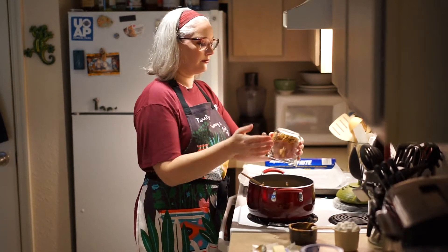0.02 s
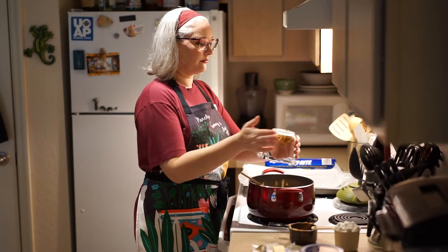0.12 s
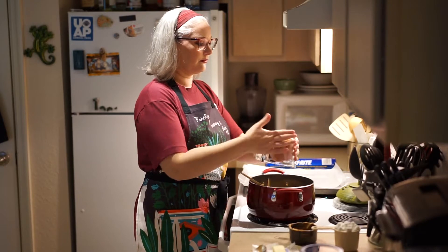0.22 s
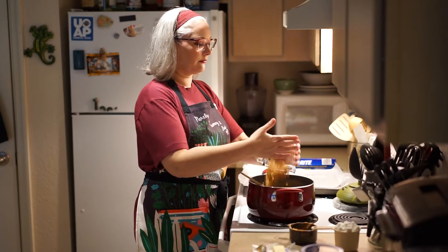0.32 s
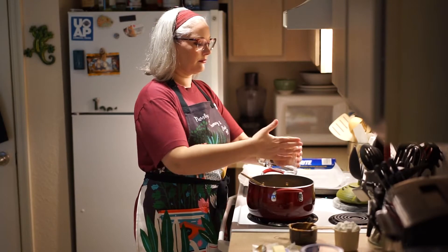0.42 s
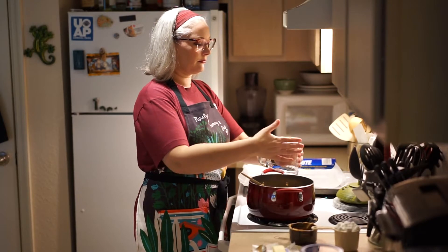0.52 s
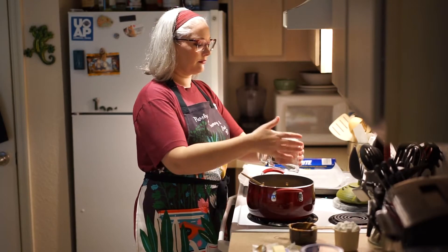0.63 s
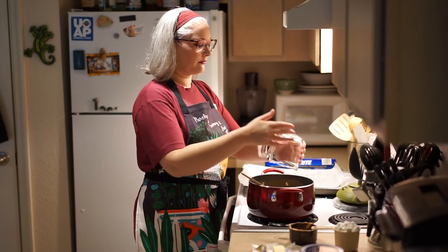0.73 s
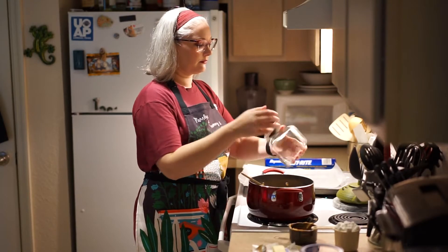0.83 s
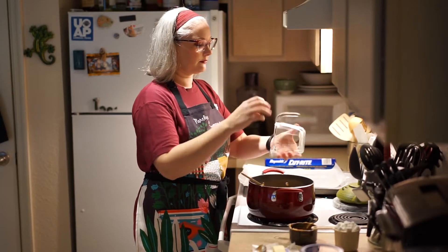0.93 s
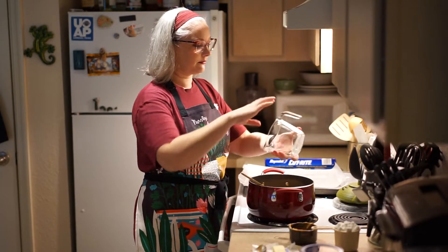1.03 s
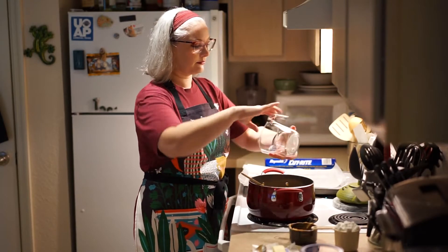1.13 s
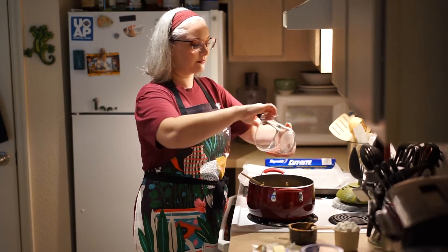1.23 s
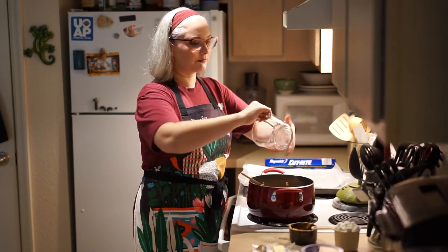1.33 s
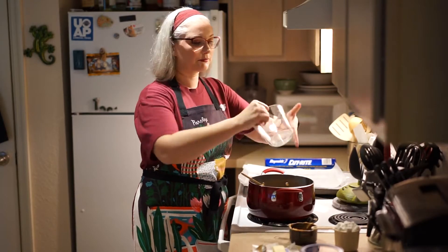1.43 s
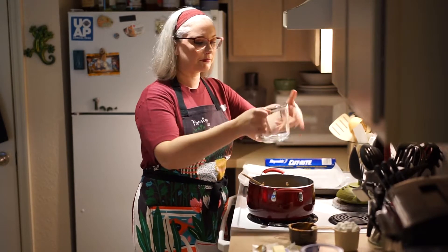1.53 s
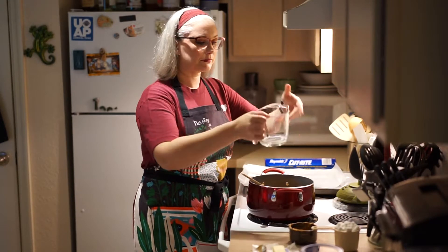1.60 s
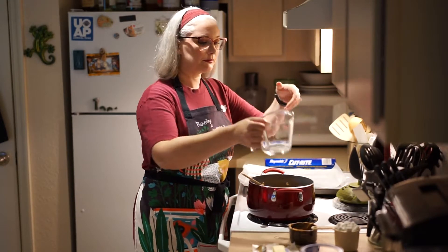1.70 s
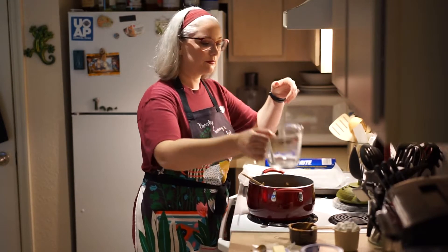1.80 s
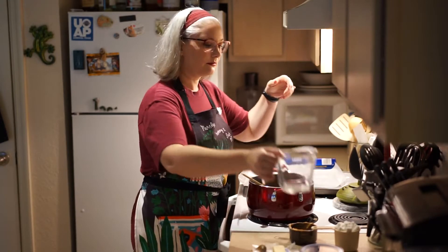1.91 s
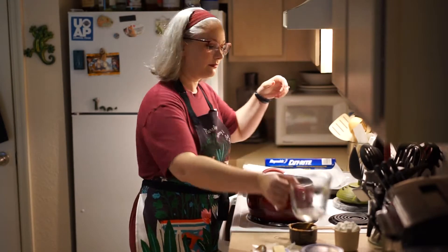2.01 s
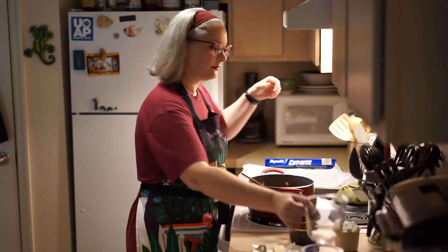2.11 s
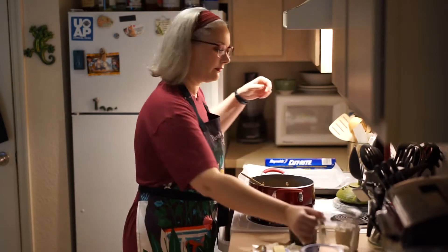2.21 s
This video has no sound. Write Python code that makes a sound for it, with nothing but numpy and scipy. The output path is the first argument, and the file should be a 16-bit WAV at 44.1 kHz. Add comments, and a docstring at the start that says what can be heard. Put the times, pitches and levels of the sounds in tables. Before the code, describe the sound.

Small hard chips pour from a glass cup into a metal pot. Faint crackling slides begin near 0.18 s, with a sharp hollow knock on the glass at 0.23 s. At 0.4 s a dense shower clatters, rings the pot and thuds, ending with a bright click around 0.52 s. The kitchen echo fades into low hum; very soft cup touches and a faint rustle come around 2.0-2.2 s.

```python
"""In a small kitchen, a glass cup of small hard chips is tipped over a metal pot.
The chips slide as crackling grains and a palm knocks the cup: filtered noise bursts over damped glass modes.
The load drops in one short shower of grains and clumps that rings the pot's modes and thuds on its bottom.
A few stragglers click onto the heap, then the empty cup is softly handled and an arm rustles.
Filtered noise and wavering sines make the air and hum of the room."""
import sys
import numpy as np
from scipy import signal
from scipy.fft import rfft, irfft, next_fast_len
from scipy.io import wavfile

SR = 44100
rng = np.random.default_rng(int(sys.argv[2]) if len(sys.argv) > 2 else 0)


def file_out(sig):
    """Save sig as 16-bit WAV at sys.argv[1]."""
    # one column per channel
    cols = np.atleast_2d(sig).T
    # limit, then scale
    lim = np.clip(cols, -1, 1)
    pcm = np.round(lim * 32767).astype(np.int16)
    wavfile.write(sys.argv[1], SR, pcm)


N = 101430  # samples


def from_db(db):
    """Turns decibels into an amplitude factor."""
    return 10 ** (np.asarray(db) / 20)


def seconds():
    """The time of every sample."""
    return np.arange(N) / SR


def rms_one(x):
    """Brings a signal to an rms of 1."""
    return x / np.sqrt(np.mean(x ** 2) + 1e-20)


def at_hz(points, hz):
    """Reads a table on a log-frequency axis."""
    f, value = np.transpose(points)
    return np.interp(np.log(np.maximum(hz, 1)), np.log(f), value)


def coloured(x, spectrum, size=8192):
    """Causal (minimum-phase) filter with the given spectrum; white noise keeps its level."""
    gain = rms_one(from_db(at_hz(spectrum, np.arange(size // 2 + 1) * SR / size)))
    # folding the cepstrum onto positive time gives minimum phase
    fold = 1 + np.sign(size // 2 - np.arange(size)) * (np.arange(size) > 0)
    cepstrum = irfft(np.log(gain)) * fold
    response = irfft(np.exp(rfft(cepstrum)))
    padded = next_fast_len(N + size)
    return irfft(rfft(x, padded) * rfft(response, padded), padded)[..., :N]


def ring(x, modes):
    """Struck modes: parallel two-pole resonators, each brought to its own rms level."""
    out = 0
    for hz, db, t60 in modes:
        radius = np.exp(-np.log(1000) / (t60 * SR))
        w = 2 * np.pi * hz / SR
        poles = [1, -2 * radius * np.cos(w), radius * radius]
        mode = signal.lfilter([1, 0, -1], poles, x + 1e-18)
        out = out + from_db(db) * rms_one(mode)
    return out


def envelope(start, fall, swell=1e-9, start_db=0):
    """Starts at once, swells from start_db to full level, then dies away exponentially."""
    t = seconds() - start
    rise = from_db(start_db * np.clip(1 - t / swell, 0, 1))
    decay = np.exp(-np.maximum(t - swell, 0) / fall)
    return (t >= 0) * rise * decay


GRAIN_SPREAD_DB = 2  # scales the random boost of each grain


def grains(per_s):
    """Random clicks of uneven size and either sign; rms 1."""
    boost_db = GRAIN_SPREAD_DB * np.minimum(rng.exponential(1, N), 3)
    sizes = from_db(boost_db) * rng.choice([-1, 1], N)
    return rms_one(sizes * (rng.random(N) < per_s / SR))


def burst(start, db, fall):
    """A contact: a brief crackle of noise that starts at the given level."""
    shape = envelope(start, fall)
    crackle = rms_one(shape * rng.standard_normal(N))
    return from_db(db) * crackle * np.sqrt(np.mean(shape ** 2))


# left-right likeness of diffuse sound: (f/Hz, likeness from 0 to 1)
STEREO_LIKENESS = [(60, 0.89), (300, 0.85), (640, 0.85), (1400, 0.57), (3000, 0), (7000, 0), (15000, 0)]


def diffuse_noise():
    """White stereo noise, alike on both sides in the bass and unrelated in the treble."""
    mid, side = rfft(rng.standard_normal((2, N)))
    alike = np.clip(at_hz(STEREO_LIKENESS, np.arange(len(mid)) * SR / N), -1, 1)
    shared = np.sqrt((1 + alike) / 2) * mid
    opposed = np.sqrt((1 - alike) / 2) * side * [[1], [-1]]
    return irfft(shared + opposed, N)


EARLY_T60_S, FIRST_ECHO_S, LEFT_LAG_S = 0.17, .003, .000014
# reverberation time of the kitchen by band: (f/Hz, t60/s)
ROOM_T60 = [(200, 0.62), (1000, 0.56), (3000, 0.53), (7000, 0.34), (14000, 0.37)]


def kitchen(x, pan_db, early_db, room_db):
    """Direct sound from slightly right, quick echoes off stove and cupboards, and a tail dying by band."""
    tail, rest = 0, diffuse_noise()
    for hz in 350 * 2. ** np.arange(7):  # upper band edges, an octave apart
        if hz < SR / 2:
            band = signal.sosfiltfilt(signal.butter(2, hz, fs=SR, output="sos"), rest)
        else:
            band = rest
        rest = rest - band
        fall = at_hz(ROOM_T60, hz / np.sqrt(2)) / np.log(1000)
        tail = tail + band * envelope(FIRST_ECHO_S * 2, fall)
    early = diffuse_noise() * envelope(FIRST_ECHO_S, EARLY_T60_S / np.log(1000))
    response = (from_db(early_db) * rms_one(early) + from_db(room_db) * rms_one(tail)) / np.sqrt(N)
    # a phase slope delays the left side by a fraction of a sample
    lag = np.exp(-2j * np.pi * np.arange(N // 2 + 1) * SR / N * LEFT_LAG_S)
    left = irfft(rfft(x) * lag, N)
    direct = np.array([left * from_db(pan_db / 2), x * from_db(-pan_db / 2)])
    return direct + signal.fftconvolve(x[None], response, axes=1)[:, :N]


def spread(source, pan_db, early_db, room_db, count):
    """The contacts are shared among several spots, each with its own echoes; grain rates are per spot."""
    spots = sum(kitchen(source(), pan_db, early_db, room_db) for _ in range(count))
    return spots / np.sqrt(count)


AIR_DB = -49
# colour of the air noise: (f/Hz, relative level/dB per Hz)
AIR_COLOUR = [(10, -45), (22, -14), (30, -10.5), (46, -2.5), (75, -7.5), (105, -6), (160, -8), (200, -10.5),
              (260, -10.5), (300, -13.5), (480, -13.5), (850, -17), (1100, -22), (2000, -26.5), (4000, -31),
              (8000, -35), (16000, -41)]
# low mids of the room over time: (t/s, level/dB)
LOW_MIDS_LEVEL = [(0, -56.5), (0.7, -54.5), (1.1, -56), (1.35, -60.5), (1.65, -57), (2.3, -67)]
# colour of those low mids: (f/Hz, relative level/dB)
LOW_MIDS_COLOUR = [(150, -29), (340, -6.5), (470, 4), (580, -7), (690, 3), (760, -17.5), (850, 2.5),
                   (1000, -26.5), (3000, -42)]
# hum of appliances: (f/Hz, rms level/dB)
HUM_TONES = [(93.7, -55), (119.8, -56.5), (253, -61.5), (339, -63), (360, -67)]
HUM_WAVER_HZ, HUM_WAVER_RAD = 4, 1  # rate of new random phases, and their rms size


def room_tone():
    """Steady air noise, low mids that rise and sink, and hum tones wavering in phase."""
    t = seconds()
    air = from_db(AIR_DB) * coloured(diffuse_noise(), AIR_COLOUR)
    low_mids_gain = from_db(np.interp(t, *np.transpose(LOW_MIDS_LEVEL)))
    out = air + low_mids_gain * coloured(diffuse_noise(), LOW_MIDS_COLOUR)
    for hz, db in HUM_TONES:
        waver = np.interp(t * HUM_WAVER_HZ, np.arange(64), rng.standard_normal(64))
        phase = 2 * np.pi * (hz * t + rng.random()) + HUM_WAVER_RAD * waver
        out = out + from_db(db) * np.sqrt(2) * np.sin(phase)
    return out


RUSTLE_S, RUSTLE_SWELL_S, RUSTLE_FALL_S, RUSTLE_DB = 2.14, 0.053, 0.05, -63
# colour of soft friction, for the rustle and the sliding chips: (f/Hz, relative level/dB)
SLIDE_COLOUR = [(300, 1), (1500, -2.5), (2600, -9), (3700, 1), (5500, -2), (8500, -3), (12000, -12.5),
                (16000, -16)]


def rustle():
    """A soft noise hiss swells and fades as the arm comes down."""
    hiss = coloured(rng.standard_normal(N), SLIDE_COLOUR)
    return from_db(RUSTLE_DB) * hiss * envelope(RUSTLE_S, RUSTLE_FALL_S, RUSTLE_SWELL_S, start_db=-24)


# chips shifting in the cup: (t/s, level/dB, fall time/s)
SLIDES = [(0.178, -51, 0.12), (0.202, -52, 0.091), (0.361, -47, 0.01)]
SLIDE_GRAINS_PER_S = 1000
SLIDE_TICK_DB, SLIDE_TICK_FALL_S = -2.5, 0.0045  # each slide starts with a tick, relative to its level


def sliding_chips():
    """Chips slide along the glass: dense fading grains, each slide led by a tick."""
    slides = sum(from_db(db) * envelope(s, fall) for s, db, fall in SLIDES)
    sliding = grains(SLIDE_GRAINS_PER_S) * slides
    ticks = sum(burst(s, db + SLIDE_TICK_DB, SLIDE_TICK_FALL_S) for s, db, _ in SLIDES)
    return coloured(sliding + ticks, SLIDE_COLOUR)


KNOCK_S, KNOCK_DB, KNOCK_FALL_S, KNOCK_RING_DB = .2329, -24, 0.0066, -57
CRACK_DB, CRACK_FALL_S = -34, 0.0081
# hollow body of the knock: (f/Hz, relative level/dB)
KNOCK_COLOUR = [(150, -30), (400, -4), (900, -12.5), (1150, -5), (1350, -7.5), (1800, 2.5), (2300, -0.5),
                (2800, -12), (3300, -14.5), (4000, -17), (6000, -28), (16000, -39)]
# sharp crack of the knock: (f/Hz, relative level/dB)
CRACK_COLOUR = [(500, -16), (3600, 9), (4800, -6), (6500, 7), (10000, -24), (13000, -12), (16000, -4)]
# glass modes damped by the hand, for knock and touches: (f/Hz, relative level/dB, t60/s)
CUP_MODES = [(1353, 0.5, 0.063), (1442, -6, 0.067), (1744, -6.5, 0.024), (2020, -13, 0.02)]


def palm_knock():
    """The palm knocks the glass: a hollow body sound, a damped ring and a sharp crack."""
    push = burst(KNOCK_S, KNOCK_DB, KNOCK_FALL_S)
    knock = coloured(push, KNOCK_COLOUR) + from_db(KNOCK_RING_DB) * ring(push, CUP_MODES)
    return knock + coloured(burst(KNOCK_S, CRACK_DB, CRACK_FALL_S), CRACK_COLOUR)


# fingers shifting on the empty cup: (t/s, level/dB)
TOUCHES = [(1.978, -63), (2.231, -70)]
TOUCH_SWELL_S, TOUCH_FALL_S, TOUCH_RING_DB = 0.0076, 0.015, -81.5
# dull colour of the touches: (f/Hz, relative level/dB)
TOUCH_COLOUR = [(500, -27), (1200, -3.5), (1500, -2), (2100, -8), (3500, -31), (10000, -30)]


def finger_touches():
    """Fingers shift on the empty cup: soft rubbing noise that faintly excites the glass modes."""
    touches = sum(from_db(db) * envelope(s, TOUCH_FALL_S, TOUCH_SWELL_S, start_db=-10)
                  for s, db in TOUCHES)
    rub = rng.standard_normal(N) * touches
    return coloured(rub, TOUCH_COLOUR) + from_db(TOUCH_RING_DB) * ring(rub, CUP_MODES)


def cup():
    """All contacts on the glass: sliding chips, the palm and the fingers."""
    return sliding_chips() + palm_knock() + finger_touches()


# stragglers landing on the heap: (t/s, level/dB, fall time/s)
STRAGGLERS = [(0.5173, -25, 0.0068), (0.527, -36, 0.031), (0.543, -40, 0.021)]
HEAP_GRAINS_PER_S = 530
# bright colour of chip on chip: (f/Hz, relative level/dB)
HEAP_COLOUR = [(300, -28), (1300, -25), (2500, -9.5), (5000, -10.5), (6800, 2), (8300, -2.5),
               (10500, -11.5), (13000, -25), (16000, -40)]


def heap():
    """Late chips click brightly on the others and settle: grains under short fades."""
    landings = sum(from_db(db) * envelope(s, fall) for s, db, fall in STRAGGLERS)
    return coloured(grains(HEAP_GRAINS_PER_S) * landings, HEAP_COLOUR)


# the shower: first arrival, swell, then dying away
SHOWER_S, SHOWER_SWELL_S, SHOWER_FALL_S, SHOWER_START_DB = .398, 0.023, 0.038, -7
SHOWER_DB, SHOWER_GRAINS_PER_S = -23, 500
# clumps that hit the bare bottom hardest: (t/s, level/dB)
CLUMPS = [(0.3972, -21.5), (0.4096, -20), (0.4212, -18), (0.431, -18.5), (0.444, -28.5)]
CLUMP_FALL_S = 0.0064
# clatter of chips on metal: (f/Hz, relative level/dB)
CHIP_COLOUR = [(150, -26), (330, -24.5), (600, -14), (1200, -6), (2000, -3.5), (3000, 2.5), (4000, 2.5),
               (5800, 1.5), (7500, -0.5), (10000, -6.5), (12500, -16.5), (16000, -27.5)]
# ringing modes of the pot: (f/Hz, relative level/dB, t60/s)
POT_MODES = [(451, -12, 0.12), (803, -15.5, 0.29), (1079, -8.5, 0.44), (1590, -9.5, 0.33), (1907, -2, 0.1),
             (2500, -8, 0.57), (2855, -24, 0.19), (3240, -2.5, 0.1), (3526, -15, 0.13), (3741, -3.5, 0.09),
             (3930, -6, 0.076), (4536, -12, .26), (5020, -6.5, 0.15), (5146, -5, 0.17), (6390, -2.5, 0.23),
             (7350, -11, 0.26)]
POT_RING_DB = -53
THUD_DB, THUD_SWELL_S, THUD_FALL_S = -35.5, 0.043, 0.0083
# thud of the mass of chips on the bottom: (f/Hz, relative level/dB)
THUD_COLOUR = [(100, -22), (280, -22), (350, -7), (440, 10.5), (600, -3), (850, -5.5), (1500, -24),
               (5000, -52)]


def pot():
    """The shower clatters on the metal, rings its modes and thuds on the bottom."""
    shower_shape = envelope(SHOWER_S, SHOWER_FALL_S, SHOWER_SWELL_S, SHOWER_START_DB)
    shower = from_db(SHOWER_DB) * grains(SHOWER_GRAINS_PER_S) * shower_shape
    hits = shower + sum(burst(s, db, CLUMP_FALL_S) for s, db in CLUMPS)
    thud_shape = envelope(SHOWER_S, THUD_FALL_S, THUD_SWELL_S, SHOWER_START_DB)
    weight = from_db(THUD_DB) * grains(SHOWER_GRAINS_PER_S) * thud_shape
    clatter = coloured(hits, CHIP_COLOUR)
    ringing = from_db(POT_RING_DB) * ring(hits, POT_MODES)
    return clatter + ringing + coloured(weight, THUD_COLOUR)


def scene():
    """Cup and pot sound in the kitchen, over its room tone."""
    handling = spread(lambda: cup() + rustle(), pan_db=-3.5, early_db=-0.5, room_db=-9, count=2)
    landing = spread(lambda: pot() + heap(), pan_db=-2.5, early_db=-1.5, room_db=-4, count=4)
    return room_tone() + handling + landing


CUTOFF_HZ = 15900


def record(dry):
    """A steep elliptic low-pass cuts the top."""
    return signal.sosfilt(signal.ellip(12, .1, 80, CUTOFF_HZ, fs=SR, output="sos"), dry)


dry = scene()
out = record(dry)
file_out(out)
```